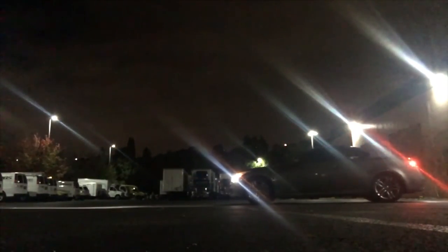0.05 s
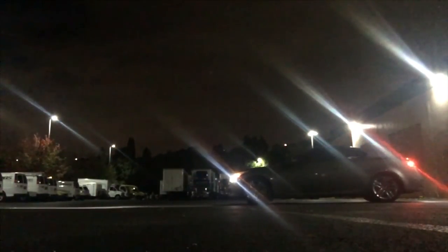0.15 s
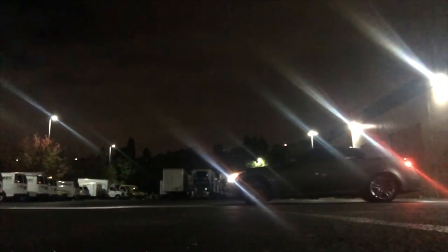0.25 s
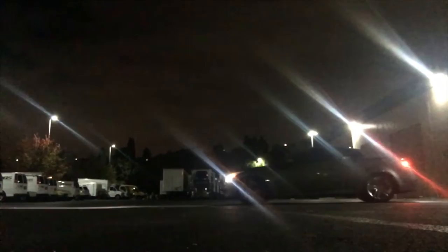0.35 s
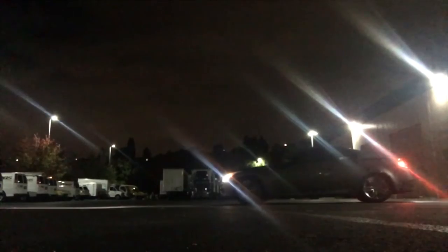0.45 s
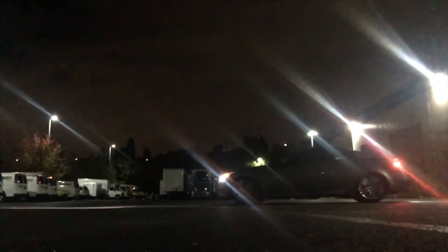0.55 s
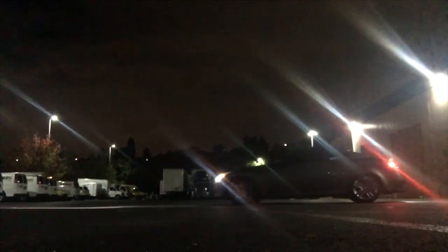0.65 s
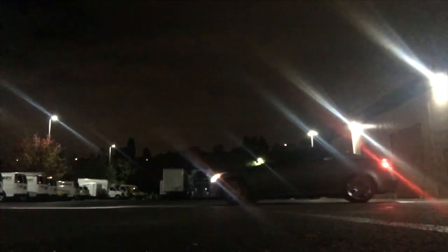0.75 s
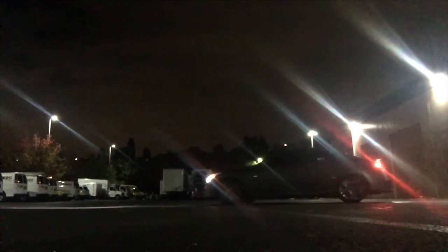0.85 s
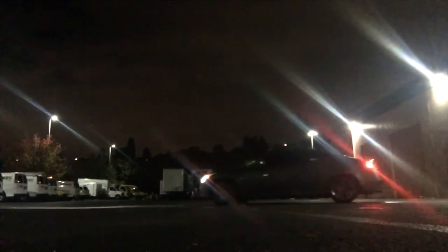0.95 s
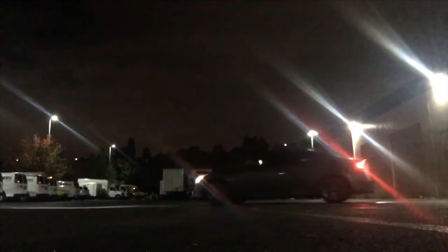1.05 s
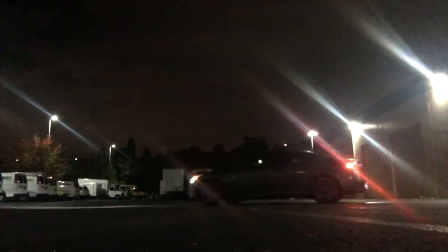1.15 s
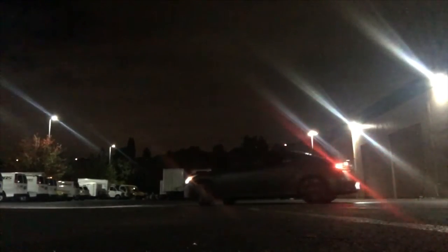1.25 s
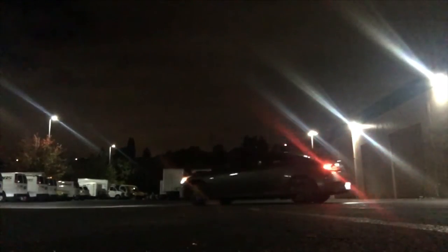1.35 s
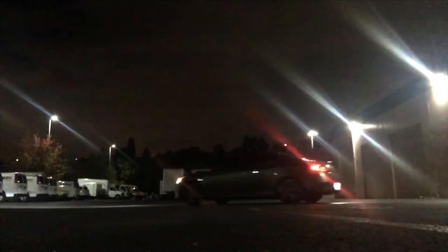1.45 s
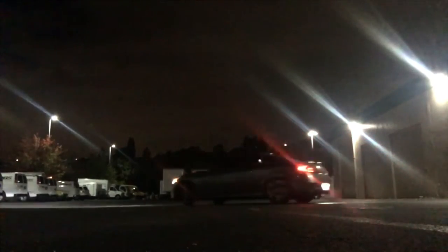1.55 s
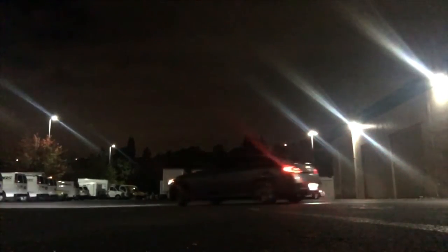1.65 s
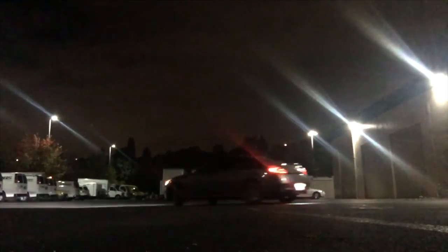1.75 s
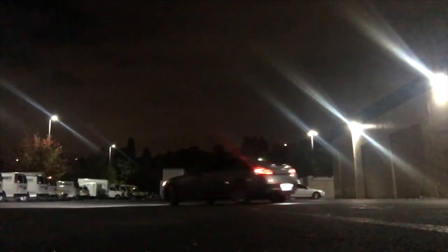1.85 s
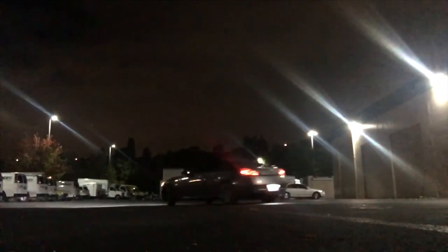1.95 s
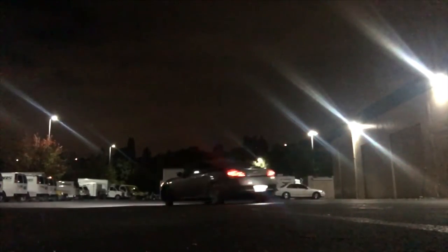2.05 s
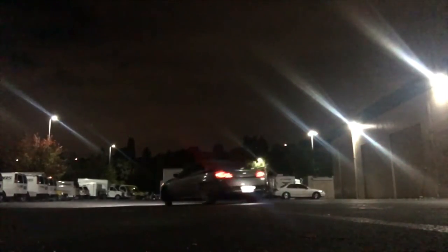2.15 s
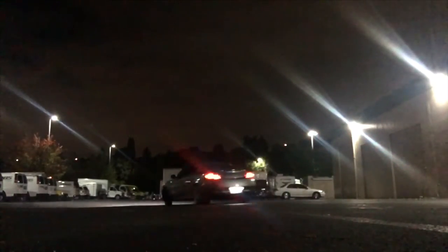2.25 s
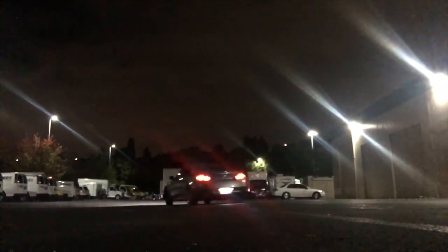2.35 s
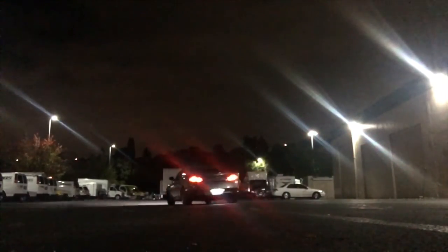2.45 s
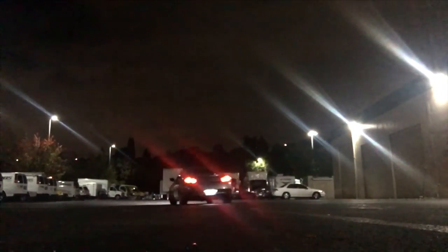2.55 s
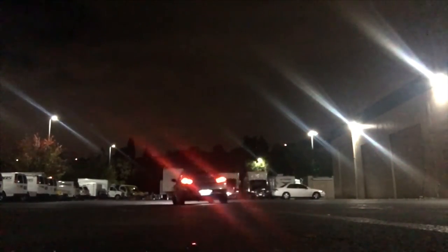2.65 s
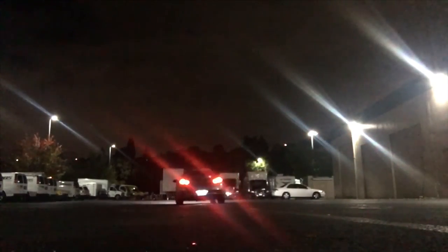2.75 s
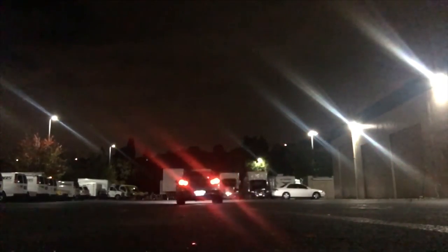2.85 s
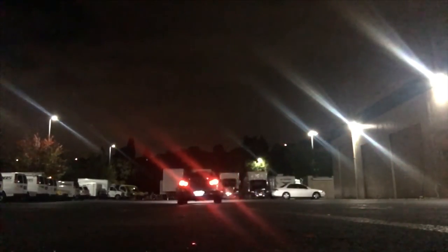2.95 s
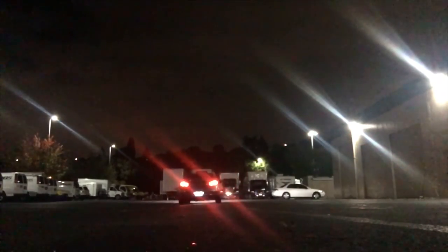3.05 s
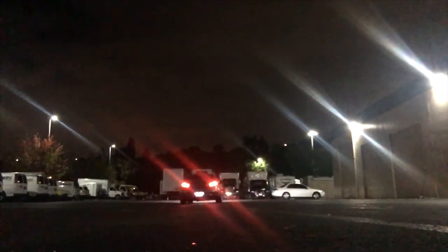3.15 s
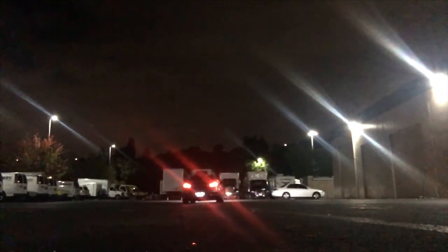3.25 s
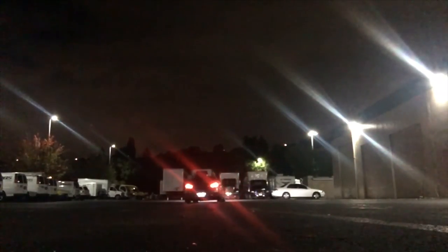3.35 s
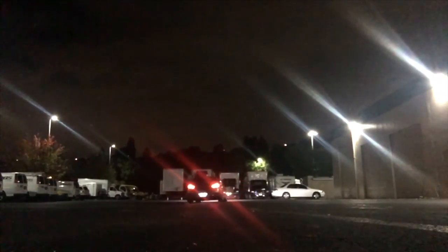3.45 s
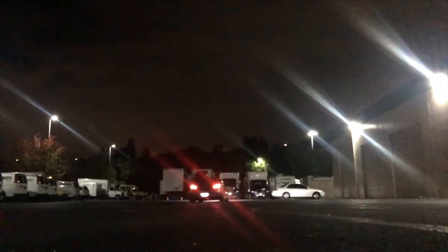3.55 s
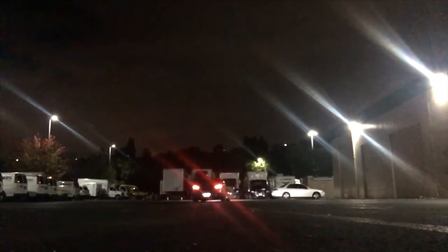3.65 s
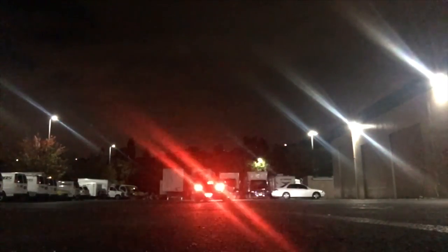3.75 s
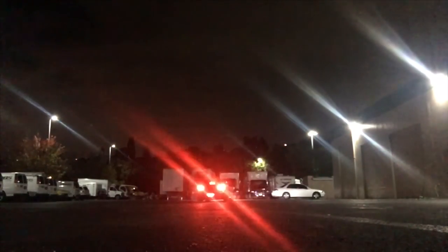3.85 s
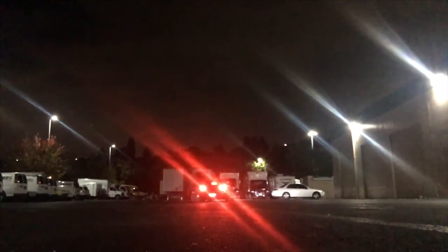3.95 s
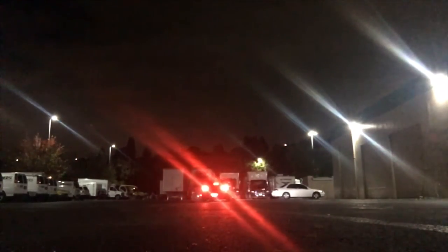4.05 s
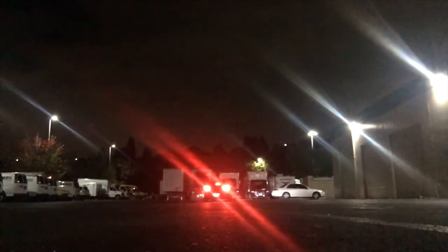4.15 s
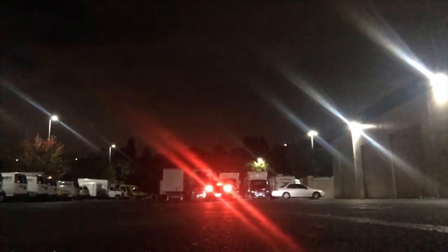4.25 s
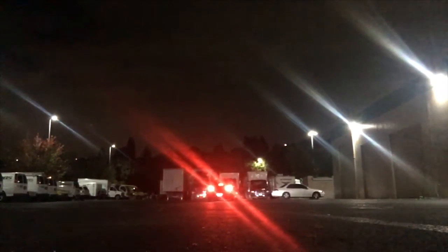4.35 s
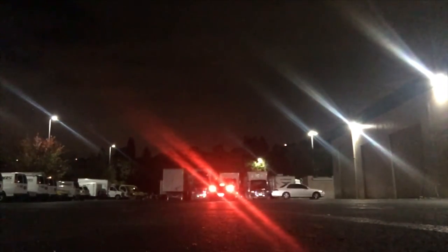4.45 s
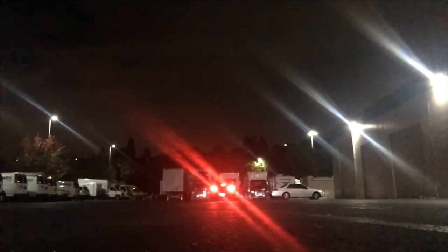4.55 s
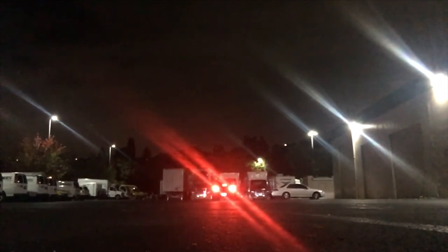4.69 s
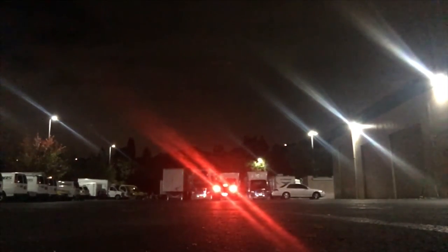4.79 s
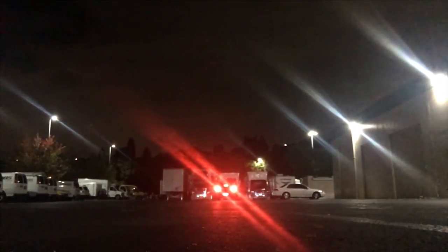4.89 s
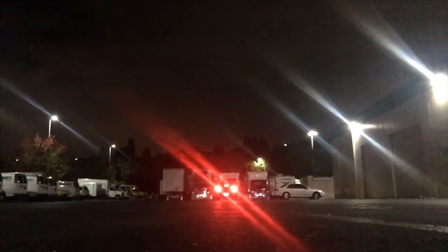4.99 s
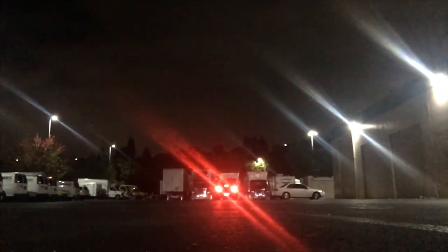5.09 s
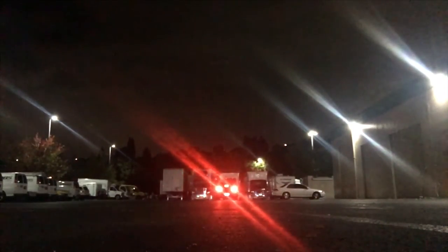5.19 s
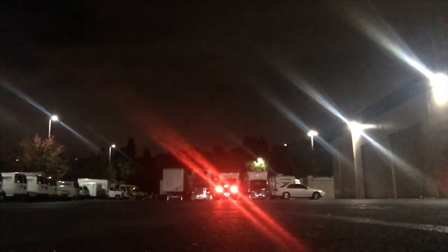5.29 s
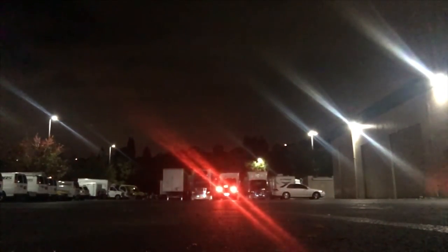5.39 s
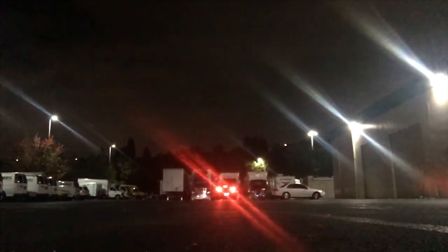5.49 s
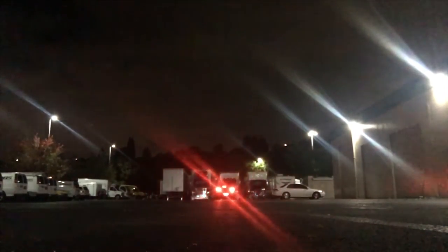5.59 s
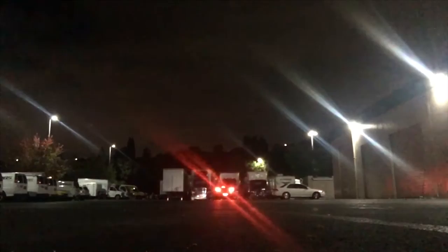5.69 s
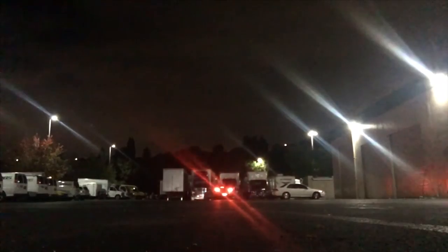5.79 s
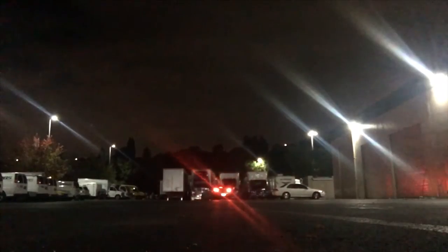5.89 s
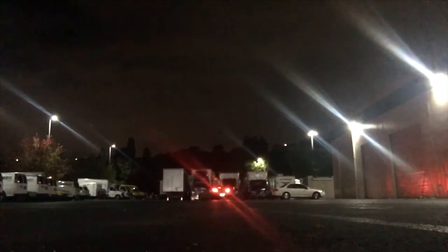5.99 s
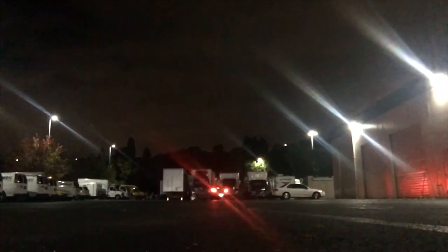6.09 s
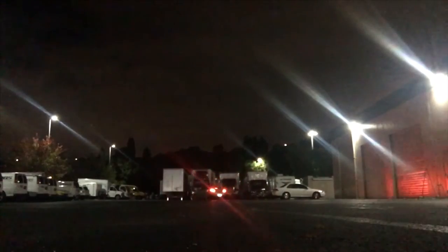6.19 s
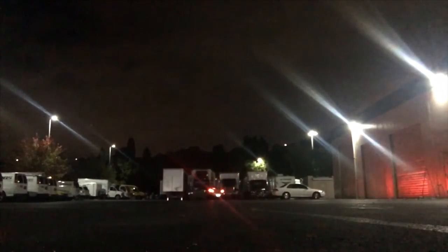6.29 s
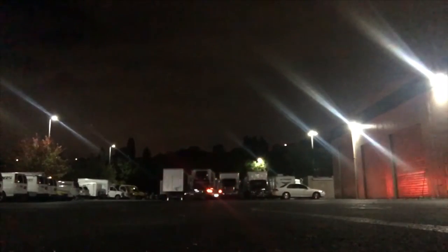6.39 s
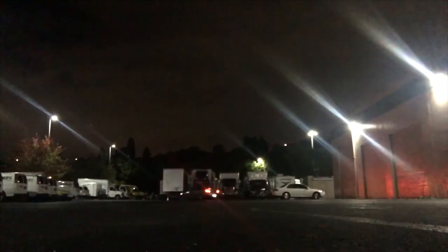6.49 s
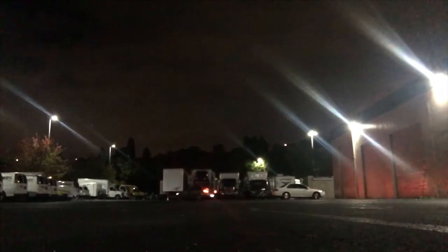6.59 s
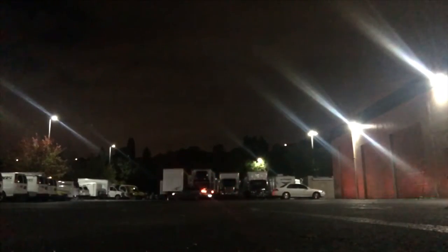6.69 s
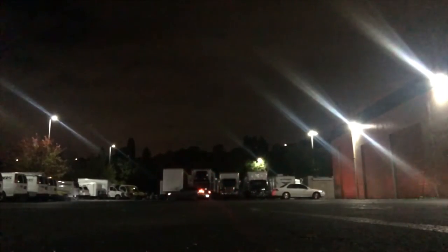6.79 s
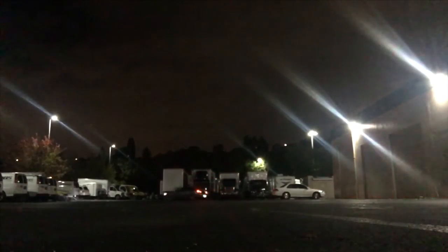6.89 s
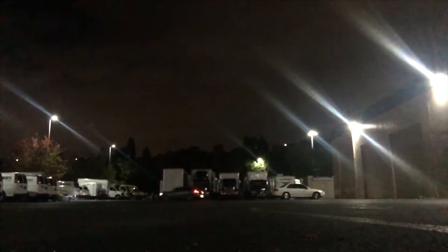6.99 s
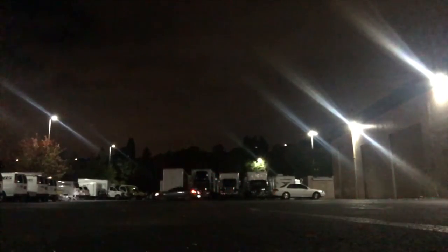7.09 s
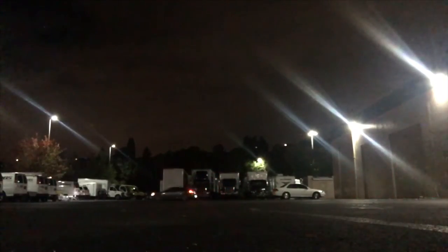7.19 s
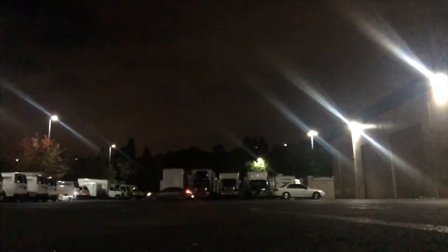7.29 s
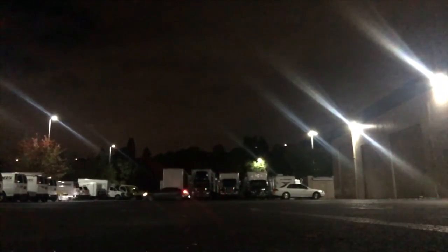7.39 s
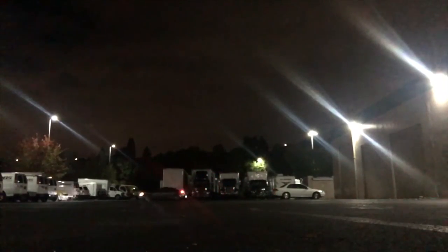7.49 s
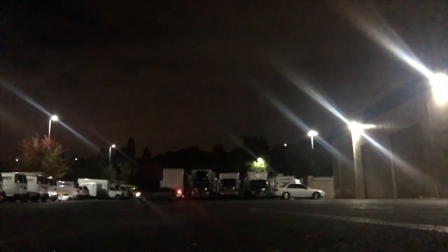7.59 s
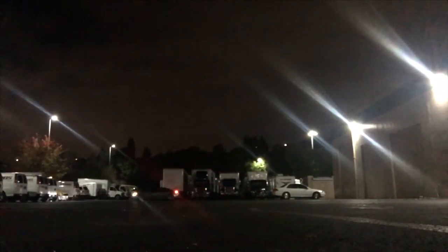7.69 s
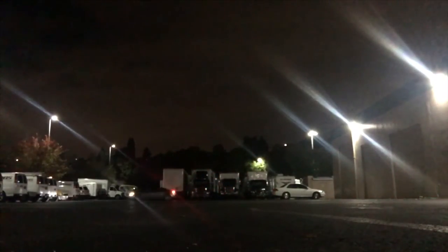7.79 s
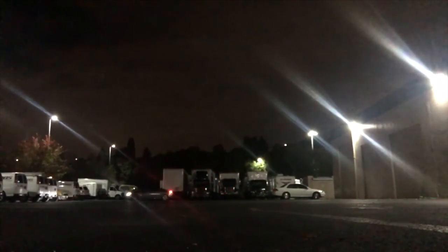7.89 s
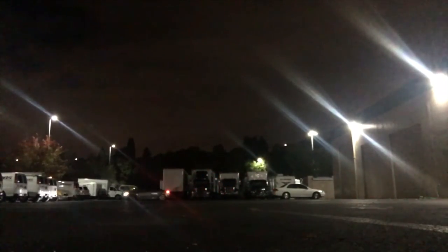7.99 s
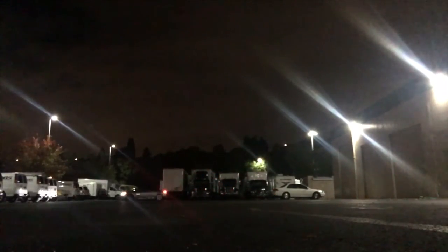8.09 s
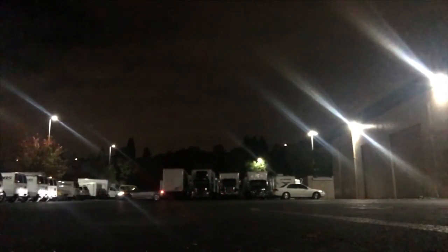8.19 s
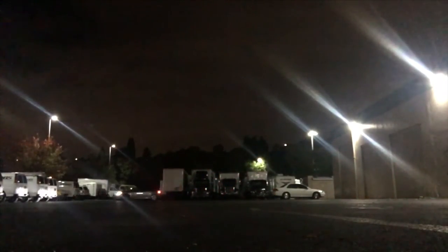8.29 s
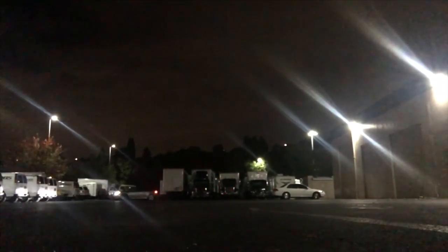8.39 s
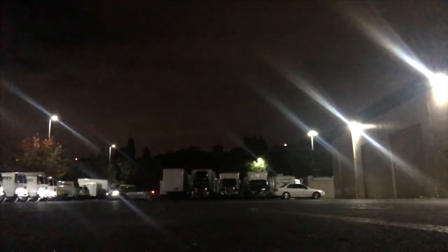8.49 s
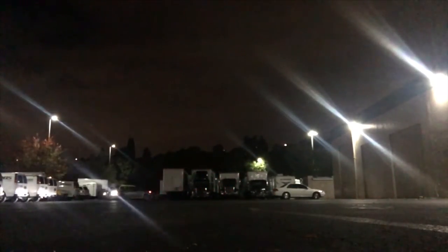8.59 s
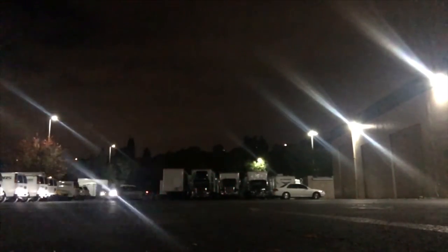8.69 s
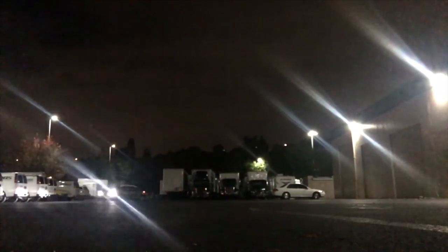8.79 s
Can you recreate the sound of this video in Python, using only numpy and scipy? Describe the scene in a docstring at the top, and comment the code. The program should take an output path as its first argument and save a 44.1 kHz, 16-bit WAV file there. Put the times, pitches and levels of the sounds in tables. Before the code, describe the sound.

A sporty car revs up with a rasping bark, drops to a distant low rumble, then picks up again lightly over crackling grit.

```python
"""A six-cylinder car with a loud exhaust pulls away in a car park at night, lifts off, rolls on at low
revs in the distance and opens the throttle again. Each firing sends a sharp pressure front and a puff
of gas down the pipe, over a deep hum. The sound bounces off the asphalt to a low microphone and echoes
off buildings. Tyres roll, grit crackles close by, and a few dull knocks sound over the night hum."""
import sys
import numpy as np
from scipy import signal
from scipy.fft import rfft, irfft
from scipy.io import wavfile
from scipy.ndimage import uniform_filter1d

SR = 44100
rng = np.random.default_rng(int(sys.argv[2]) if len(sys.argv) > 2 else 0)


def wav_record(signal):
    """Record a signal, one row per channel, as 16-bit PCM in the file named by sys.argv[1]."""
    frames = np.transpose(np.atleast_2d(signal))
    bounded = np.clip(frames, -1, 1)
    # unit amplitude maps onto the largest positive 16-bit level
    quanta = np.round(bounded * 32767).astype(np.int16)
    wavfile.write(sys.argv[1], SR, quanta)


N = 389837
T = np.arange(N) / SR

# the tone of crushed grit: (frequency [Hz], level [dB])
GRIT_TONE = [(1200, -71), (2000, -2.5), (3200, -1.5), (4200, 6), (4900, 6.5), (5600, 8), (7500, -3),
             (10500, -8), (13000, -13), (15800, -13.5)]
# how far unsteady burning shifts each firing: (time [s], shift [share of the gap between firings])
FIRING_JITTER = [(0, .08), (1.3, .05), (1.6, .018), (1.95, .008), (3.12, .008), (3.22, .05), (3.4, .12),
                 (4.9, .12), (5.4, .05), (6.8, .05), (7.3, .1), (8.1, .05), (8.84, .05)]
# the hum, set by throttle and distance: (time [s], level [dB], change per higher harmonic [dB])
HUM_LEVELS = [(0.0, -34.5, -7.5), (0.2, -42.5, 0), (0.45, -25, -4), (0.7, -33.5, -3), (1.2, -28, -3),
              (1.6, -27, 0.75), (2.0, -27.5, 2.23), (2.6, -26, 3.5), (3.12, -25.5, 2), (3.3, -35, 0.7),
              (3.6, -43, -1), (4.1, -42.5, -1), (4.7, -48.5, -2), (5.4, -49, 0.2), (6.5, -49, -0.5),
              (7.2, -49.5, -3.5), (7.92, -59, -9), (8.06, -36, -5), (8.5, -42.5, -0.6), (8.84, -36, -1.5)]


def gain_of(db):
    """Turn decibels into a factor to multiply by."""
    return 10 ** (np.asarray(db) / 20)


def evened(x):
    """Scale a signal to an average power of 1."""
    return x / np.sqrt(np.mean(x ** 2) + 1e-20)


def steady(x):
    """Even out slow changes of level, so faster pulses are no louder."""
    return x / np.sqrt(abs(uniform_filter1d(x ** 2, size=8000)) + 1e-12)


def drift(samples):
    """A random wander, smoothed over this many samples."""
    return evened(uniform_filter1d(uniform_filter1d(rng.standard_normal(N), samples), samples))


def curves(rows):
    """Turn each column after the times into a smoothly joined curve."""
    times, *columns = np.transpose(rows)
    return [np.interp(T, times, column) for column in columns]


def bumps(rows):
    """Add up bell-shaped changes of level: (time [s], change [dB], length [s])."""
    return sum(db * np.exp(-np.log(16) * ((T - s) / length) ** 2) for s, db, length in rows)


def at_pitch(table, hz):
    """Look up a table by frequency, with octaves evenly spaced."""
    frequencies, values = np.transpose(table)
    return np.interp(np.log(hz + 1), np.log(frequencies + 1), values)


def colour(x, tone):
    """Give a signal a tone; the filter rings only after a pulse, so pulses stay sharp."""
    db = np.maximum(at_pitch(tone, abs(np.fft.fftfreq(8192, 1 / SR))), -100)
    response = np.exp(np.conj(signal.hilbert(np.log(gain_of(db)))))
    taps = np.fft.ifft(response).real[:4096]
    return signal.oaconvolve(x, taps / np.linalg.norm(taps))[:len(x)]


def wash(tone, patchy_db):
    """Noise of a given tone, with drifting louder and softer patches."""
    frames, hz = N // 256 + 5, np.fft.rfftfreq(1024, 1 / SR)
    real, imag, patches = rng.standard_normal((frames, 513, 3)).T
    patches = evened(uniform_filter1d(uniform_filter1d(patches, size=12, axis=0), size=14, axis=1))
    spectra = (real + 1j * imag) * gain_of(at_pitch(tone, hz)[:, None] + patchy_db * patches)
    return evened(signal.istft(spectra, nperseg=1024, noverlap=768)[1][:N])


def ticks(per_s, spread_db, decay):
    """Tiny bursts of noise at random moments; each shrinks by the factor decay every sample."""
    sizes = gain_of(spread_db * np.minimum(rng.exponential(1, N), 3))
    hits = sizes * (rng.random(N) < per_s / SR)
    return signal.lfilter([1], [1, -decay], hits) * rng.standard_normal(N)


def night_hum():
    """A low, gently shifting wash of noise."""
    # (frequency [Hz], level [dB])
    night_tone = [(15, -61), (25, -18), (148, 2), (211, -7), (292, -23), (604, -31), (1090, -23.5),
                  (1880, -26), (4340, -38), (4960, -36.5), (5830, -42), (7050, -47.5), (15800, -69)]
    return gain_of(-39.5) * wash(night_tone, patchy_db=2.5)


def knocks(blow_s=0.024):
    """Dull knocks some way off: a scraping blow sets a few short tones ringing."""
    # the blows: (time [s], peak [dB])
    blows = [(1.447, -27.5), (6.234, -42), (6.242, -30.5), (6.286, -37.5), (6.318, -46), (7.63, -35.5)]
    # the ringing tones: (frequency [Hz], level [dB], time to fade by 60 dB [s])
    tones = [(1114, -4, 0.031), (1594, -2.5, 0.013), (2030, 0.5, 0.0084), (2570, -11, .01)]
    out, t = np.zeros(N), np.arange(4000) / SR
    ring = sum(gain_of(db - 60 * t / fade_s) * np.sin(2 * np.pi * hz * t) for hz, db, fade_s in tones)
    for s, db in blows:
        blow = rng.standard_normal(len(t)) * np.exp(-t / blow_s)
        knock = signal.oaconvolve(blow, ring)[:len(t)]
        out[round(s * SR):][:len(t)] += gain_of(db) * knock / abs(knock).max()
    return out


def grit_scrapes(edge_s=0.09, clump_db=3, ticks_per_s=45):
    """Grit scrapes in clumpy stretches and short strokes, with faint stray ticks throughout."""
    # fine scraping: (start [s], length [s], level at the start [dB], level at the end [dB])
    stretches = [(6.677, 0.79, -57, -58.5), (8.05, 0.89, -60.5, -71)]
    # short, louder scrapes: (middle [s], strength [dB], length [s])
    strokes = [(4.228, -42, 0.039), (4.707, -42, 0.0088), (6.82, -40, .012), (6.85, -38, 0.012),
               (6.96, -39, 0.0092), (7.029, -37, 0.0077), (7.058, -43, 0.011), (7.08, -44, .024),
               (7.112, -38, .014), (8.214, -41, .018), (8.284, -37.5, 0.01), (8.341, -30.5, 0.0072),
               (8.362, -36, .017), (8.387, -35.5, 0.013), (8.425, -39, .011), (8.462, -36, .01),
               (8.597, -39, 0.03), (8.645, -36, 0.016), (8.682, -43, 0.0069), (8.694, -39, 0.016),
               (8.732, -38, .012), (8.787, -29, .006), (8.804, -32, 0.0066), (8.83, -39, 0.02)]
    level = np.zeros(N)
    for s, length, start_db, end_db in stretches:
        corners_s = [0, edge_s, length - edge_s, length]
        level += np.interp(T - s, corners_s, [0, gain_of(start_db), gain_of(end_db), 0])
    tick_rate = ticks_per_s * np.where(level > 0, 7, 1)  # busier during a stretch
    level *= gain_of(clump_db * drift(200))
    for s, db, length in strokes:
        level += gain_of(db) / 2 * np.exp(-8 * ((T - s) / length) ** 2)
    strays = colour(np.gradient(ticks(tick_rate, spread_db=4, decay=0.97)), GRIT_TONE)
    return level * wash(GRIT_TONE, patchy_db=3.5) + gain_of(-66.5) * evened(strays)


def grit_cracks(width_hz=2500, rise_s=0.0006, fade_s=0.0073):
    """Grit is crushed close by: each crack is a burst with its own pitch and a fizz on top."""
    # (time [s], peak [dB], pitch [Hz], fizz compared with the burst [dB])
    cracks = [(2.4984, -32, 6310, -21), (2.6284, -39, 3940, -14), (2.7534, -23.5, 3380, -23),
              (2.7756, -24, 3500, -30), (2.7934, -32, 3560, -10), (3.4594, -51, 3840, -15),
              (3.8394, -36, 3400, -20), (4.007, -39, 3500, -25), (4.2228, -31, 5770, -29),
              (4.2597, -37, 4450, -25), (4.2772, -34, 5770, -35), (4.4588, -36, 5290, -25),
              (4.7057, -50, 5760, -22), (5.3844, -50, 3460, -22), (6.1315, -35, 5860, -24),
              (6.7625, -33, 4140, -23), (6.792, -31, 6060, -34), (6.8104, -31, 4300, -24),
              (6.8433, -31, 5420, -21), (6.8603, -29, 5290, -29), (6.8867, -27, 4240, -50),
              (6.8994, -31, 4560, -24), (6.9282, -25.5, 5990, -30), (6.9531, -29, 5930, -24),
              (6.9614, -29.5, 5380, -27), (6.995, -30, 5620, -24), (7.0135, -37, 6100, -21),
              (7.0279, -25.5, 5370, -29), (7.0564, -36, 5780, -20), (7.1028, -31, 5580, -31),
              (7.1526, -34, 5530, -19), (7.1906, -37, 4380, -19), (7.208, -30, 5400, -26),
              (7.2594, -36, 5420, -28), (7.2774, -31, 4330, -25), (7.2918, -36, 4590, -31),
              (7.637, -35, 6800, -21), (7.6939, -34, 5190, -21), (7.8146, -29.5, 5200, -28),
              (7.9508, -33.5, 5260, -32), (8.0835, -28, 5960, -27), (8.2072, -32, 5340, -22),
              (8.2372, -29, 4640, -25), (8.2811, -36, 5340, -21), (8.325, -30, 6040, -19),
              (8.337, -31, 4360, -20), (8.3524, -28, 5240, -15), (8.3789, -24.5, 5120, -22),
              (8.4277, -27, 5380, -26), (8.4432, -27, 6200, -29), (8.4836, -33, 6140, -21),
              (8.5096, -28, 5190, -27), (8.5175, -27, 5990, -30), (8.5495, -31, 4660, -21),
              (8.5889, -27, 5390, -22), (8.5959, -23, 4090, -26), (8.6228, -23.5, 4040, -29),
              (8.6323, -26.5, 4170, -24), (8.6692, -25, 3500, -25), (8.6777, -24.5, 5150, -25),
              (8.7226, -21.5, 5450, -29), (8.7745, -25.5, 5940, -25), (8.7844, -36, 5120, -20),
              (8.7969, -30, 6210, -25), (8.8114, -27.5, 3430, -23), (8.8248, -29, 5420, -21)]
    out, t = np.zeros(N), np.arange(1500) / SR
    decay = np.exp(-np.pi * width_hz / SR)
    for s, db, hz, fizz_db in cracks:
        noise = rng.standard_normal(len(t)) * np.minimum(t / rise_s, gain_of(-60 * t / fade_s))
        burst = colour(noise, GRIT_TONE)
        ring = signal.lfilter([1], [1, -2 * decay * np.cos(2 * np.pi * hz / SR), decay ** 2], burst)
        burst = evened(burst) + 0.38 * evened(ring)
        fizz = signal.lfilter(*signal.butter(3, 8000, "high", fs=SR), noise)
        crack = burst / abs(burst).max() + gain_of(fizz_db) * fizz / abs(fizz).max()
        slot = out[round(s * SR):][:len(t)]
        slot += gain_of(db) * crack[:len(slot)]
    return out


def tyres():
    """The tread makes a rushing noise as it rolls."""
    # (time [s], level [dB])
    rolling_level = [(0, -46.5), (1, -51.5), (2, -28.5), (3, -48), (3.6, -44), (4.2, -44), (5, -46.5),
                     (5.6, -50), (6.5, -53.5), (7.5, -64), (8.84, -57)]
    # (frequency [Hz], level [dB])
    tread_tone = [(150, -21), (300, 1.5), (450, -10.5), (700, -11.5), (1100, -7.5), (1600, -10.5),
                  (2500, -23), (4000, -27.5), (6000, -30.5), (9000, -41), (12000, -41.5), (16000, -54.5)]
    return gain_of(curves(rolling_level)[0]) * wash(tread_tone, patchy_db=1)


def grit_spray(start_s=2.4, end_s=2.9, ticks_per_s=110):
    """The tyres flick fine grit as the car gathers speed: thin, high ticks."""
    flicks = ticks(ticks_per_s * (T > start_s) * (T < end_s), spread_db=5, decay=0.985)
    return gain_of(-50.5) * signal.lfilter(*signal.butter(2, [7500, 14500], "band", fs=SR), flicks)


def throbs(hz=72, length_s=0.06):
    """Two soft swells of one low tone under the engine note."""
    swells = [(2.45, -22), (2.66, -24)]  # (time [s], peak [dB])
    level = sum(gain_of(db) * np.exp(-np.log(16) * ((T - s) / length_s) ** 2) for s, db in swells)
    return level * np.sin(2 * np.pi * hz * T)


def wall_echoes(x, fade_s=0.75):
    """Scattered echoes come back from buildings and parked lorries."""
    echoes = np.zeros(SR)
    delays = np.arange(900, SR - 20, 20) + rng.integers(0, 20, (SR - 901) // 20)
    echoes[delays] = rng.choice([-1., 1.], len(delays)) * gain_of(-60 * delays / SR / fade_s)
    echoes = signal.lfilter([1], [1, -0.6], echoes)  # treble is lost on the way
    return signal.fftconvolve(x, echoes / np.linalg.norm(echoes))[:N]


def with_ground_bounce(x):
    """A bounce off the asphalt cancels some pitches, which climb as the car moves away."""
    # the bounce: (time [s], delay [ms], share of the direct sound [0-1])
    bounce_path = [(0, 4.4, 0), (1.5, 2.4, 0), (1.8, 1.99, 0.9), (2, 1.72, 0.45), (2.25, 1.2, 0.55),
                   (2.45, 0.79, 0.37), (2.6, 0.46, 0.8), (2.72, 0.29, 0.17), (2.85, 0.24, 0),
                   (3.3, 0.33, 0), (8.84, 0.22, 0.54)]
    delay_ms, share = curves(bounce_path)
    bounce = np.interp(T - delay_ms / 1000, T, x)
    bounce = signal.lfilter(*signal.butter(1, 4500, fs=SR), bounce)  # rough asphalt scatters the treble
    return (x + share * bounce) / np.sqrt(1 + share ** 2)


def engine(strong_firing_s=2.7465, bank_db=2):
    """Six unequal cylinders fire in turn: gives rate, running count, a pulse per firing and strength."""
    # engine speed: (time [s], firings a second [Hz])
    speed = [(0, 40.4), (0.15, 41.6), (0.24, 40.2), (0.45, 48.45), (0.825, 61.4), (1.05, 64.9), (1.2, 65.1),
             (1.425, 75.3), (1.575, 94.8), (1.65, 100), (1.95, 119.07), (2.025, 123.39), (2.1, 124.92),
             (2.175, 124.74), (2.325, 127.7), (2.4, 131.27), (2.475, 132.66), (2.55, 132.15),
             (2.625, 130.92), (2.7, 132.49), (2.775, 135.7), (2.85, 139.85), (2.925, 142.95), (3.0, 144.95),
             (3.075, 144.2), (3.15, 135.34), (3.375, 113.9), (3.5, 100), (3.6, 103), (3.675, 97.5),
             (4.125, 83), (4.275, 69.5), (4.375, 69.5), (4.8, 57.75), (5.1, 52.5), (5.55, 50.6),
             (6.15, 50.6), (6.45, 48.8), (6.7, 50), (7.05, 46.9), (7.8, 46.4), (7.9, 43.5), (8.275, 70.1),
             (8.35, 73.7), (8.425, 72.5), (8.5, 78.5), (8.575, 77.2), (8.65, 80.2), (8.84, 82.4)]
    # each of the six cylinders: (strength [dB])
    cylinder_db = [3, 2, 1, -.6, -1.8, -3.2]
    # cylinders differ more at high revs: (firings a second [Hz], unevenness [factor])
    unevenness = [(60, 0.45), (126, 0.63), (132, 2.1), (146, 1.6)]
    hz = curves(speed)[0]
    count = np.cumsum(hz) / SR
    count -= count[round(strong_firing_s * SR)]  # the strongest cylinder fires at count 0
    shaky_count = count + curves(FIRING_JITTER)[0] * drift(250)
    firing = np.maximum.accumulate(np.floor(shaky_count)).astype(int)
    fronts = np.diff(firing, prepend=firing[0])
    strength_db = at_pitch(unevenness, hz) * np.take(cylinder_db, firing % 6)
    strength_db += bank_db * (-1.) ** firing  # one row of three cylinders is stronger than the other
    strength_db += 0.5 * rng.standard_normal(2000)[firing - firing.min()]
    return hz, count, fronts, strength_db


def exhaust_hum(hz, count, strength_db, wavers, lag_s=0.0013):
    """The pipe hums at 1 to 5 times the firing rate; these harmonics waver with unsteady burning."""
    # what the pipe lets out: (frequency [Hz], level [dB])
    pipe_tone = [(40.0, 0.5), (55.0, 6), (75.0, 4), (95.0, -2.8), (120.0, 9.5), (146.0, 13), (165.0, 4),
                 (185.0, 2.5), (210.0, 7), (260.0, -0.96), (330.0, -5.5), (400.0, -4.8), (500.0, -12),
                 (620.0, -5.5), (730.0, -18)]
    # brief swells and dips, one list per harmonic: (time [s], change [dB], length [s])
    swells = [
        [(.78, -20, 0.13), (1.72, 10, 0.23), (1.88, -5, 0.061), (2.97, -2.5, .2), (3.16, 2, 0.092),
         (3.44, 3.5, 0.087), (4.26, -5, 0.19), (4.64, -24, 0.13), (5.26, -10, .12), (7.2, -7, .7),
         (8.08, -0.5, 0.043), (8.68, 10, 0.24)],
        [(.62, -24, .08), (1.14, -8, 0.18), (1.24, -27, 0.065), (1.8, -16, 0.31), (2.16, -8, 0.21),
         (3.7, -1.5, 0.34), (4.02, 9, 0.096), (4.34, 11, 0.09), (5.18, -23, 0.29), (6.1, -6, 0.71),
         (6.86, -12, 0.24), (8.14, -8, 0.039), (8.24, 4.5, 0.06), (8.6, -9, 0.061), (8.7, 9.5, 0.15)],
        [(.7, 5.5, .15), (1.12, -13.5, 0.77), (2.12, -12, .27), (3.6, -1, 0.21), (5., 6.5, .15),
         (5.24, -14, 0.16), (6., 1.5, 1.4), (8.48, -22, .6)],
        [(.52, -19, 0.48), (2.4, -8, 0.13), (2.82, 3., 0.17), (3.6, -4.5, 0.44), (5.9, 5.5, 1.07),
         (7.5, -7, .6)],
        [(.2, -15, .5), (2.08, 3, 0.19), (2.3, 3., .15), (2.5, -17.5, 0.33), (2.95, 5.5, 0.2), (3.5, -8, 0.41),
         (5.8, -18.5, 2.7), (7.6, -8, 1)],
    ]
    hum_db, tilt_db = curves(HUM_LEVELS)
    waver_db = 18 * curves(FIRING_JITTER)[0]
    late = count - lag_s * hz  # a dip in pressure follows each front, deeper after a strong firing
    depth_db = uniform_filter1d(np.interp(late + 0.5, count, strength_db), size=80)
    hum = np.zeros(N)
    for k, waver in enumerate(wavers):
        db = hum_db + k * tilt_db + at_pitch(pipe_tone, (k + 1) * hz) + bumps(swells[k])
        db += waver_db * waver + 0.31 * k * depth_db
        hum -= np.sqrt(2) * gain_of(db) * np.cos(2 * np.pi * (k + 1) * late)
    return hum


def exhaust(puff_share=0.068, steady_flow=0.52, pop_s=0.047):
    """Pressure fronts bark and snap, the gas jet rasps and roars, and the pipe hums underneath."""
    # the pipes swing towards us, then move away: (time [s], bark level [dB], rasp level [dB])
    tailpipe_levels = [(0, -87, -60.5), (.4, -54.5, -53), (1.2, -51, -49.5), (1.4, -40, -50),
                       (1.5, -32, -44), (1.7, -23, -41.5), (1.85, -29.5, -37), (2.02, -16.5, -36),
                       (2.1, -21, -32.5), (2.3, -18.5, -36), (2.4, -21, -39.5), (2.5, -26, -41.5),
                       (2.6, -20, -45.5), (2.8, -24, -45), (3.0, -20.5, -51), (3.2, -27.5, -51.5),
                       (3.3, -31.5, -70), (3.42, -49.5, -78), (4.3, -55, -85.5), (6, -68.5, -79),
                       (7.5, -68, -62), (7.95, -68.5, -57), (8.4, -54.5, -59.5), (8.84, -60, -72)]
    # how sharp the fronts are with the throttle open: (time [s], extra snap [dB])
    sharpness = [(1.4, -1.5), (1.7, -2.), (2, 1), (2.2, 1.), (2.4, 3.5), (2.55, 2.5), (2.7, 0.5),
                 (2.85, -5), (3, 2.5), (3.2, -1.5), (3.4, 0.)]
    # the tone of each part: (frequency [Hz], level [dB])
    bark_tone = [(150, -42.5), (300, 2.5), (500, 10.5), (750, 4), (950, -5.5), (1300, 4), (2500, -22),
                 (6000, -78.5)]
    snap_tone = [(500, -56), (900, -3.5), (1300, 10), (2000, -6.5), (3000, -19), (5000, -32), (9000, -68.5),
                 (14000, -69)]
    rasp_tone = [(300, -21), (700, -9), (1500, -8), (3000, -11.5), (5000, -13.5), (7000, -21),
                 (11000, -27.5), (16000, -36)]
    roar_tone = [(120, -35.5), (250, 4.5), (400, -0.5), (600, -8), (900, -10), (1300, -8), (2000, -27),
                 (4000, -66.5)]
    chug_tone = [(25, -48), (50, 10), (100, 15), (200, 12.5), (350, -5), (600, -30.5), (1500, -101.5)]
    bark_db, rasp_db = curves(tailpipe_levels)
    pop_db = bumps([(3.095, 7.8, pop_s), (3.131, 4.2, pop_s)])  # two cracks on lifting off
    # the other parts follow how far these levels are from full throttle [dB]
    bark_change, rasp_change, hum_change = bark_db + 20, rasp_db + 33, curves(HUM_LEVELS)[0] + 26
    snap_db = -18.5 + curves(sharpness)[0] + bark_change + 0.36 * rasp_change + 1.4 * pop_db
    roar_db = -32.5 + 0.33 * bark_change + 0.1 * rasp_change
    chug_db = -31.5 + 0.65 * hum_change + 0.1 * rasp_change

    wavers = [drift(2500) for _ in range(5)]  # one for each harmonic of the hum
    hz, count, fronts, strength_db = engine()
    hum = exhaust_hum(hz, count, strength_db, wavers)
    strength = gain_of(strength_db)
    usual = uniform_filter1d(strength, size=6000)
    # the bark leaves out the five harmonics that the hum already plays
    harmonics = sum(np.cos(2 * np.pi * k * count) for k in range(1, 6))
    upper = strength * fronts - usual * 2 * hz / SR * harmonics
    bark = gain_of(bark_db + pop_db) * steady(colour(-upper, bark_tone))
    # a stronger front steepens more on its way down the pipe
    snap = gain_of(snap_db) * steady(colour(-strength ** 1.35 * fronts, snap_tone))
    puffs = np.exp(-(count % 1) / puff_share)
    jet = strength ** 0.19 * (steady_flow + puffs) * rng.standard_normal(N)
    rasp = gain_of(rasp_db + pop_db) * steady(colour(jet, rasp_tone))
    roar = gain_of(roar_db) * steady(colour(jet, roar_tone))
    # unequal firings chug at pitches between the harmonics
    chug = gain_of(chug_db) * steady(colour((strength - usual) * fronts, chug_tone))
    return hum + chug, bark + snap + rasp + roar


def scene():
    """Mix the car, its echoes, the grit and the night into one channel."""
    low, high = exhaust()
    car = low + with_ground_bounce(high)
    mix = car + tyres() + night_hum() + gain_of(-13) * wall_echoes(car)
    mix += grit_scrapes() + grit_cracks() + knocks() + throbs() + grit_spray()
    return mix[None]


def record(dry, ceiling=1.1, top_hz=15850):
    """The microphone colours the treble, rounds off the highest peaks and cuts the very top."""
    # dips caused by its housing: (frequency [Hz], level [dB])
    housing_tone = [(20, 2), (4400, -1), (4950, -5.5), (5500, 0), (9600, -0.5), (10500, -6.5),
                    (11400, -2.5), (22050, -7)]
    heard = irfft(rfft(dry) * gain_of(at_pitch(housing_tone, np.fft.rfftfreq(N, 1 / SR))), N)
    rounded = ceiling * np.tanh(heard / ceiling)
    top_cut = signal.firwin(1535, top_hz, window=("kaiser", 9), fs=SR)
    return signal.oaconvolve(rounded, top_cut[None], "same")


dry = scene()
out = record(dry)
wav_record(out)
```